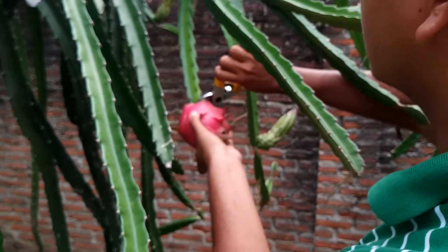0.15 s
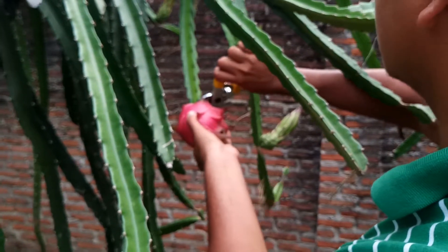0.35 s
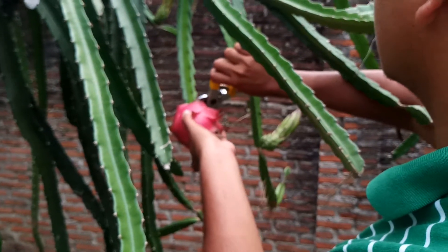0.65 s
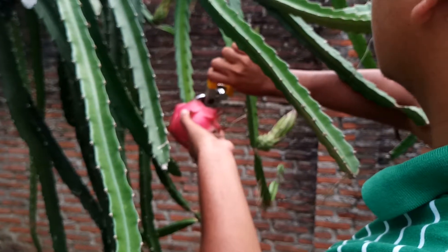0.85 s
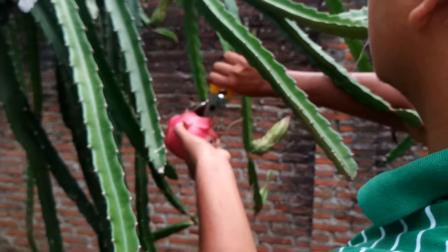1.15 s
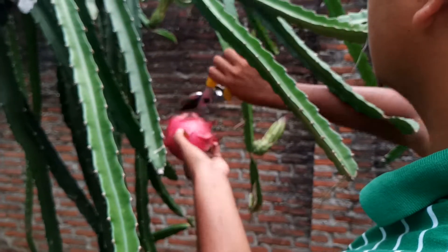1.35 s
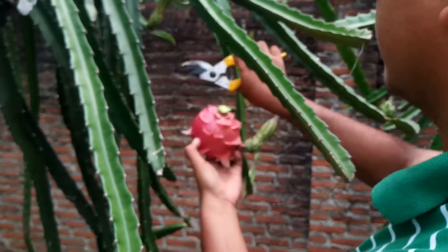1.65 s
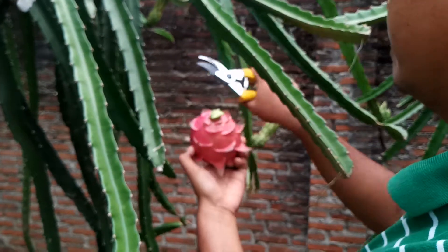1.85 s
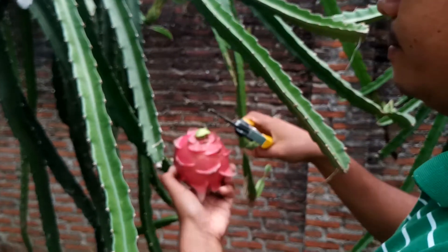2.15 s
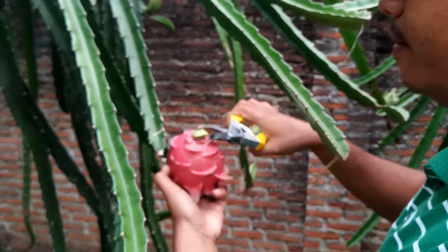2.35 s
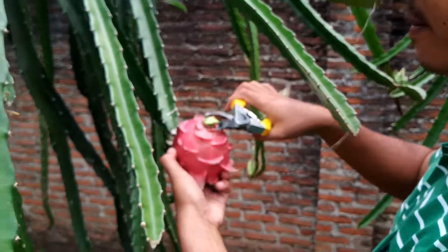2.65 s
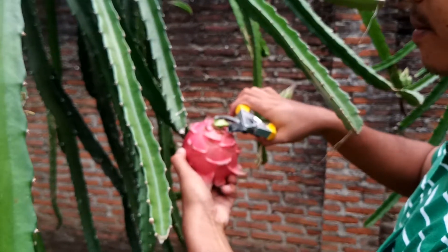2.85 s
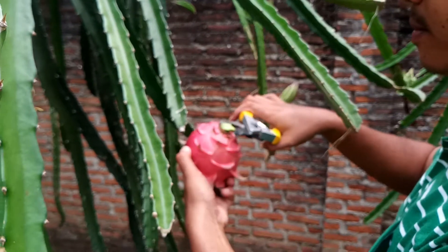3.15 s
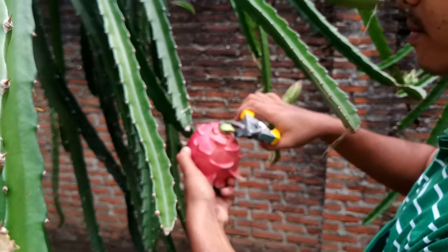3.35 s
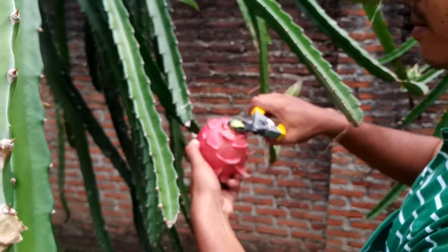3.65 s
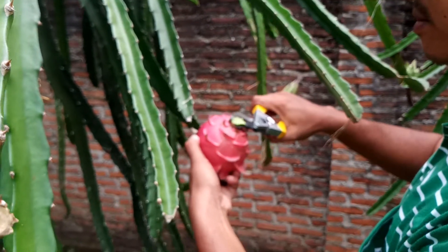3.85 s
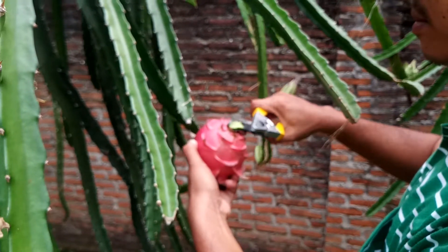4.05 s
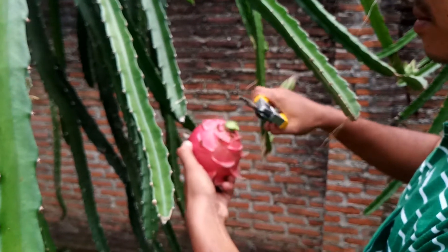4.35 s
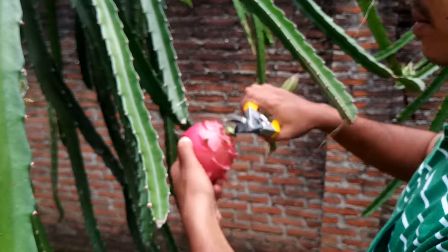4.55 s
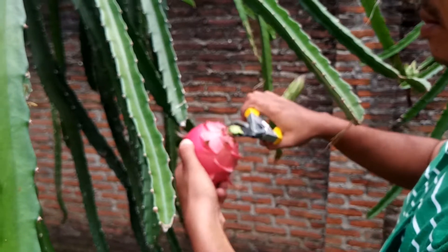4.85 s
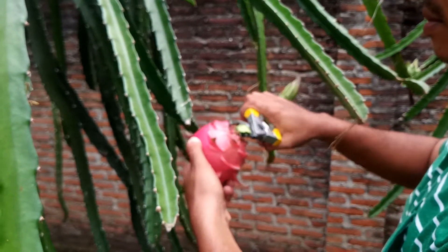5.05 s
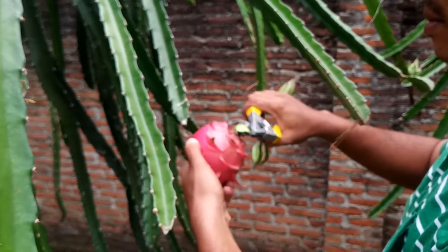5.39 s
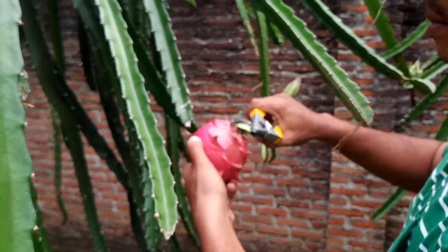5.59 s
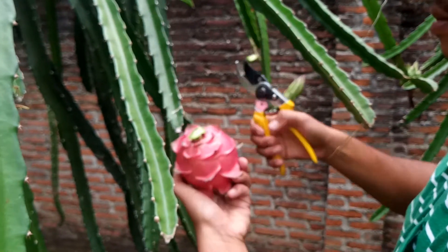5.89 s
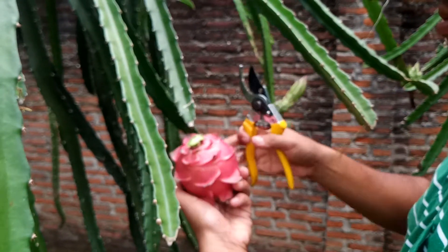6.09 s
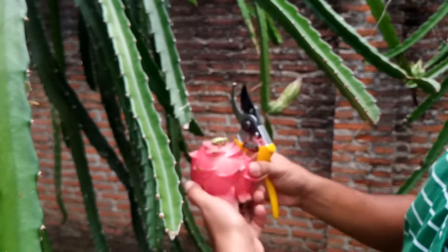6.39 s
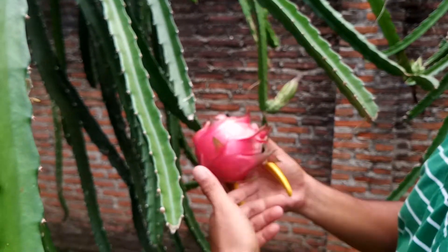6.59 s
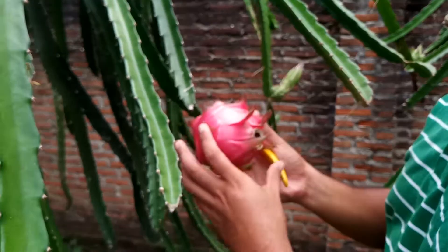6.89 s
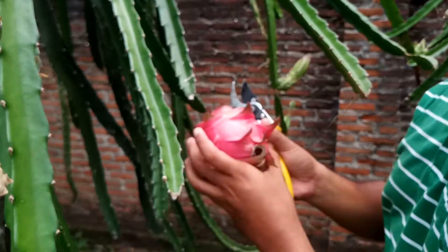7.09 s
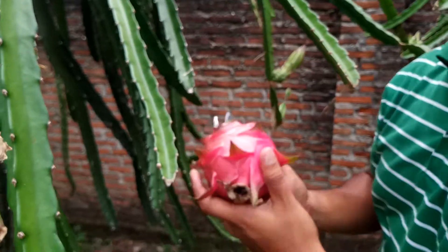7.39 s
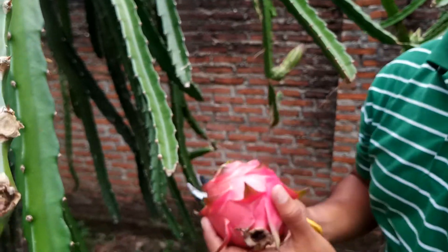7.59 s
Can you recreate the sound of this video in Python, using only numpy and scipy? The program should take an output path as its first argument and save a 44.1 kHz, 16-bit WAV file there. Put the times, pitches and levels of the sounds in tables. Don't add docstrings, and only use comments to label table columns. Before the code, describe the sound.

Outdoor walled garden, close stereo microphone, quiet background. From 0 to 0.8 s the last note of a distant rooster crow sags and dies, with faint hen clucks around it. At about 1.05 s shears tear through a thick juicy stem: a loud, dense crunch lasting hundredths of a second, with bright blade ring and short brick echo. Soft palm rubs and tiny ticks follow. Small birds give thin falling seeps near 1.6 and 2.9 s, a level peep at 3.3. Light leaf ticks from 3.4 s lead to fibre crackles at 4.0 and a sharp second snip at 4.12, then a small metallic click at 4.3. From 4.9 to 6.8 s peeps and seeps become more frequent. Fruit handling ticks at 6.4; skin and leaf rustles gather from 7 s, loudest at the end. Throughout: steady high insect band, low traffic rumble, barely audible machine hum, airy hiss.

```python
import sys
import numpy as np
from scipy import signal
from scipy.fft import rfft, irfft, next_fast_len
from scipy.io import wavfile
from scipy.ndimage import uniform_filter1d, map_coordinates

SR = 44100
rng = np.random.default_rng(int(sys.argv[2]) if len(sys.argv) > 2 else 0)


def inscribe(sig):
    pcm = np.round(np.clip(np.atleast_2d(sig).T, -1, 1) * 32767)
    wavfile.write(sys.argv[1], SR, pcm.astype(np.int16))


def field_ratio(decibels):
    return 10 ** (np.asarray(decibels, dtype=float) / 20)


N = 340893
TIME = np.arange(N) / SR


def unit(x):
    return x / np.sqrt(np.mean(x ** 2) + 1e-20)


def along(points, hz):
    point_hz, value = np.transpose(points)
    return np.interp(np.log(hz + 1), np.log(point_hz + 1), value)


def curves(rows):
    s, *columns = np.transpose(rows)
    return [np.interp(TIME, s, column) for column in columns]


def wobble(rate_hz, size=N):
    knots = rng.standard_normal(int(size * rate_hz / SR) + 4)
    return map_coordinates(knots, [TIME[:size] * rate_hz])


def filtered(x, response):
    size = next_fast_len(x.shape[-1] + 4096)
    hz = np.fft.rfftfreq(size, 1 / SR)
    return irfft(rfft(x, size) * response(hz), size)[..., :x.shape[-1]]


def stereo(pair, gain, alike):
    def mid_side_gain(hz):
        turn = np.arccos(np.clip(along(alike, hz), -1, 1)) / 2
        return gain(hz) * [np.cos(turn), np.sin(turn)]

    mid, side = filtered(pair, mid_side_gain)
    return np.array([mid + side, mid - side])


def sides(pan_db):
    return field_ratio([[pan_db / 2], [-pan_db / 2]])


def tail(t60, seconds, build_s):
    hz, t, z = signal.stft(rng.standard_normal((2, round(seconds * SR))), SR, nperseg=128)
    growth = 1 - np.exp(-(t + 1e-4) / build_s)
    decay = field_ratio(-60 * t / t60(hz)[:, None])
    echo = signal.istft(z * growth * decay, SR, nperseg=128)[1]
    return echo / np.linalg.norm(echo[0])


# frequency in Hz, correlation.
NEAR_ALIKE = [(600, 0.5), (1400, 0.58), (3100, 0.2), (6000, 0.04), (12000, -0.1)]


def tearing(shape, colour, body_db, sizzle_db, spiky_db):
    clumps = field_ratio(spiky_db * rng.exponential(size=len(shape) // 16 + 1))
    clumps = np.repeat(clumps, 16)[:len(shape)]
    breaks = unit(clumps) * rng.standard_normal((2, len(shape))) * shape
    tilt = [(3800, body_db), (5000, 0.0294), (8800, 0.0089), (10000, sizzle_db)]
    top = filtered(breaks[0], lambda hz: field_ratio(along(colour, hz)) * (hz > 5800) * (hz < 9000))
    scale = np.linalg.norm(shape) / np.linalg.norm(top)
    return scale * stereo(breaks, lambda hz: field_ratio(along(colour, hz) + along(tilt, hz)), NEAR_ALIKE)


# frequency in Hz, t60 in s.
GARDEN_T60 = [(300, 0.82), (2000, 0.29), (6000, 0.21), (12000, 0.14)]


def echoed(s, sound):
    echo = tail(lambda hz: along(GARDEN_T60, hz), 0.4, build_s=0.0024)
    wet = field_ratio(-12.5) * signal.fftconvolve(sound, echo, axes=1)
    heard = np.pad(wet, ((0, 0), (150, 0)))
    heard[:, :sound.shape[1]] += sound
    start = round(s * SR)
    return slice(start, start + heard.shape[1]), heard


# frequency in Hz, density in dB per Hz.
STEM = [(88, -40), (150, -23), (348, -31), (601, -15), (979, -28.5), (1260, -13.5), (1530, -15.5),
        (2140, -8.5), (3350, -13.5), (5570, -6.5), (7620, -7.5), (10800, -26), (13700, -27), (15100, -12),
        (16000, -36)]
# frequency in Hz, density in dB per Hz.
STUB = [(180, -71), (300, -52.5), (828, -20.5), (1030, -19.5), (1480, -11.5), (1640, -15), (2000, -12),
        (3030, -7.5), (3520, -8), (4370, -12), (6520, -1.5), (9390, -17.5), (13800, -26.5), (15000, -17),
        (16000, -30)]
# time in s, peak in dB, body in dB, sizzle in dB, left-right in dB.
CUTS = [(1.0108, -34.5, -23.5, -32, 2), (1.0472, -17, -3, -16, 1), (1.0506, -16.5, -5.5, -18, -0.5),
        (1.0557, -18.5, -2, -16, -1), (1.059, -28, -6.5, -16, -4), (3.9893, -29, -4.5, -19.5, 0),
        (4.0274, -38.5, -5.5, -17, -2), (4.0885, -43.5, -11, -21, -1), (4.0993, -44.5, -7, -19, -5),
        (4.1109, -34.5, -4, -19, -4), (4.1156, -25, 0, -8, 4), (4.1187, -17, -2.5, -10, 2.5),
        (4.1267, -15.5, -8.5, -18.5, -4), (4.2073, -41, -0.5, -29, -3), (4.291, -42.5, -2.5, -36, -4)]
# time in s, peak in dB.
THIN_TICKS = [(3.7826, -42), (3.868, -57), (3.9233, -48), (3.9439, -50), (3.9644, -45), (3.969, -47),
              (4.4884, -52), (5.197, -54), (5.6276, -54), (5.7778, -38.5), (7.3552, -40.5)]
# time in s, peak in dB.
DULL_TICKS = [(.837, -54), (1.3409, -50), (1.4533, -52), (2.3669, -46), (2.467, -51), (3.3235, -51),
              (5.059, -51), (6.4203, -39.5), (7.1132, -50), (7.421, -50)]
# time in s, peak in dB.
CRISP_TICKS = [
    (1.8, -49),
    (2.0294, -54),
    (3.4577, -47),
    (3.475, -42.5),
    (3.7464, -45),
    (3.8397, -50),
    (7.3011, -36),
]
# time in s, peak in dB.
KNOCKS = [
    (.2446, -53),
    (2.6953, -63),
    (4.2797, -62),
    (5.7404, -63),
]
TRIM_FROM_S = 2
LAST_FIBRE_FROM_S = 1.058
SCATTER_DB = 3


def cut_t60_s(s):
    if s > TRIM_FROM_S:
        return 0.027
    return 0.036 if s > LAST_FIBRE_FROM_S else 0.014


def cracks():
    out = np.zeros((2, N + SR))
    t = np.arange(-SR // 50, SR // 8) / SR
    events = [(*cut, cut_t60_s(cut[0])) for cut in CUTS]
    # ticks, body_db, sizzle_db
    kinds = (THIN_TICKS, -24, -27), (DULL_TICKS, -12, -25), (CRISP_TICKS, -13, -16), (KNOCKS, 5.5, -17)
    for ticks, body_db, sizzle_db in kinds:
        for s, db in ticks:
            events.append((s, db, body_db, sizzle_db, rng.normal(0, SCATTER_DB), 0.025))
    for s, db, body_db, sizzle_db, pan_db, t60_s in events:
        rise = 1 - np.exp(-np.abs(t) / 0.00037)
        shape = (t > 0) * rise * field_ratio(-60 * np.abs(t) / t60_s)
        colour = STUB if s > TRIM_FROM_S else STEM
        crack = tearing(shape, colour, body_db + 2.5, sizzle_db + 15.5, spiky_db=-0.4)
        span, heard = echoed(s + t[0], field_ratio(db - 3.5) * sides(pan_db) * crack)
        out[:, span] += heard
    return out[:, :N]


# peak time in s, frequency in Hz, peak in dB.
RINGS = [(1.047, 4500, -26), (1.049, 2120, -24.5), (1.049, 1780, -29), (1.052, 618, -52), (1.05, 800, -49),
         (1.05, 1350, -40), (1.058, 223, -53), (1.0555, 5550, -13.5), (1.05, 7200, -22),
         (4.118, 840, -43.5), (4.118, 1500, -34.5), (4.117, 3400, -18.5), (4.119, 2650, -30),
         (4.12, 2050, -31), (4.1275, 6500, -19), (4.292, 1300, -52.5), (4.291, 3400, -42),
         (4.296, 5300, -24), (4.301, 5500, -40), (4.3033, 5750, -27.5), (3.7, 5500, -43), (7.52, 313, -61),
         (7.52, 1450, -59), (3.991, 1750, -43), (3.991, 3250, -38), (3.991, 5200, -34), (6.422, 4650, -42),
         (7.304, 5100, -42), (5.1, 5750, -45)]


def rings():
    out = np.zeros((2, N + SR))
    t = np.arange(-SR // 50, SR // 8) / SR
    for s, hz, db in RINGS:
        rise_s = 0.0004 + 1.6 / hz
        t60_s = 0.04 * (hz / 1000) ** -0.59
        shape = np.where(t < 0, np.exp(-(t / rise_s) ** 2), field_ratio(-60 * np.abs(t) / t60_s))
        port_delay_s = np.array([[0], [0.00012]])
        ring = shape * np.sin(2 * np.pi * hz * (t - port_delay_s))
        start = round((s + t[0]) * SR)
        out[:, start:start + len(t)] += field_ratio(db + 2.0 * wobble(200, size=len(t))) * ring
    return out[:, :N]


def shears():
    return cracks() + rings()


# middle in s, rms in dB, length in s.
PALM_RUBS = [(.801, -75, 0.072), (1.075, -53.5, 0.032), (1.131, -54, 0.022), (1.38, -64.5, 0.05),
             (1.892, -67.5, .05), (2.403, -69, 0.089), (4.305, -57.5, 0.023), (5.792, -67, 0.027),
             (7.203, -66, 0.047), (7.279, -68.5, 0.075), (7.441, -64, 0.043), (7.525, -55, 0.046)]
# middle in s, rms in dB, length in s.
SKIN_SLIDES = [
    (.925, -61, 0.04),
    (2.116, -64.5, 0.07),
    (3.61, -64, .048),
    (3.791, -58.5, 0.023),
    (4.951, -73.5, .45),
    (6.369, -60, 0.021),
    (7.038, -56, 0.032),
    (7.355, -57, 0.042),
]
# middle in s, rms in dB, length in s.
LEAF_BRUSHES = [
    (3.493, -61.5, 0.046),
    (3.957, -78, .05),
    (5.384, -65, 0.011),
    (6.459, -59, .038),
    (7.63, -60, 0.14),
    (7.722, -53, .06),
]


def rustle():
    out = np.zeros((2, N + 4 * SR))
    # swishes, body_db, sizzle_db
    kinds = (PALM_RUBS, 1.45, -14.5), (SKIN_SLIDES, -8, -21), (LEAF_BRUSHES, -5.5, -9.5)
    for swishes, body_db, sizzle_db in kinds:
        for s, db, length_s in swishes:
            reach = SR // 4 if length_s < 0.1 else SR
            t = np.arange(-reach, reach) / SR
            swell = np.exp(-(t / length_s) ** 2)
            swish = tearing(swell, STUB, body_db, sizzle_db + 5.0, spiky_db=2.0)
            swish *= field_ratio(1.46 * wobble(69.7, size=len(t)))
            start = round(s * SR) + SR - reach
            out[:, start:start + len(t)] += field_ratio(db) * sides(rng.normal(-1, SCATTER_DB)) * swish
    return out[:, SR:SR + N]


# start in s, length in s, start pitch in Hz, level in dB.
SEEPS = [
    (.405, 0.023, 8250, -70),
    (1.646, 0.026, 8000, -65),
    (2.804, 0.013, 8300, -69),
    (2.915, 0.026, 7930, -64),
    (3.096, 0.022, 8660, -79),
    (5.192, 0.045, 7620, -66),
    (5.826, .06, 7950, -60),
    (6.514, .075, 7490, -60.5),
]
# start in s, length in s, pitch in Hz, level in dB.
PEEPS = [(.43, 0.025, 6850, -79), (.43, 0.038, 4900, -77), (3.287, 0.021, 6290, -62),
         (3.4, .022, 7300, -70), (4.892, .055, 6480, -68), (5.246, 0.032, 6950, -69),
         (5.438, .038, 7410, -79), (5.563, 0.07, 6280, -63), (5.878, 0.13, 6890, -70.5),
         (6.25, 0.087, 5800, -69), (6.578, 0.19, 6330, -73)]
# start in s, length in s, start pitch in Hz, level in dB.
CLUCKS = [(.75, 0.028, 2230, -71), (0.82, 0.087, 510, -73.5), (0.71, .23, 425, -76.5),
          (1.171, 0.105, 1255, -78), (2.446, 0.062, 1273, -78), (2.12, .04, 3870, -77),
          (1.5, .05, 1900, -86), (3.48, 0.028, 1920, -79), (7.57, .13, 800, -73.5), (7.54, .1, 1300, -72.5),
          (7.58, .12, 1700, -75)]


def birds():
    out = np.zeros((2, N + 2 * SR))
    # calls, end pitch over start, echo t60_s, huskiness
    kinds = (SEEPS, 0.86, 0.38, 0.0089), (PEEPS, 1.01, 0.65, 0.012), (CLUCKS, 0.94, 0.21, 0.033)
    for calls, glide, t60_s, husky in kinds:
        for s, length_s, from_hz, db in calls:
            u = np.arange(SR // 4) / (length_s * SR)
            pitch_hz = from_hz * (1 + (glide - 1) * u) * (1 + husky * wobble(150, size=len(u)))
            shape = np.sin(np.pi * np.clip(u, 0, 1)) ** 0.1305 * (u < 1)
            note = field_ratio(db) * shape * np.sin(2 * np.pi * np.cumsum(pitch_hz) / SR)
            echo = tail(lambda hz: np.full_like(hz, t60_s), 0.55, build_s=0.021)
            heard = signal.fftconvolve(note[None], echo, axes=1)
            heard[:, :len(u)] += 0.1 * note
            start = round(s * SR)
            out[:, start:start + heard.shape[1]] += field_ratio(8.5) * heard
    return out[:, :N]


# time in s, loudness in dB, beak opening (second partial over first) in dB.
CROW = [
    (0, -65, -2),
    (.08, -65.5, 13),
    (.2, -66.5, 12),
    (.29, -69.5, -3.5),
    (.43, -69.5, 12),
    (.49, -80, 2),
    (.57, -69, 1),
    (.635, -66, -19),
    (.8, -80, -16),
]


def rooster():
    loud_db, open_db = curves(CROW)
    pitch_hz = 763.4 - 124 * np.minimum(TIME, 1) ** 2
    phase = 2 * np.pi * np.cumsum(pitch_hz * (1 + 0.00506 * wobble(60))) / SR
    first_db = loud_db - open_db / 2
    second_db = loud_db + open_db / 2
    fifth_db = -17.5 + 12 * TIME + loud_db + np.minimum(open_db, 0) / 2
    voice = np.zeros(N)
    for k, db in ((1, first_db), (2, second_db), (5, fifth_db)):
        voice += field_ratio(db + 3 + 2.8 * wobble(45)) * np.sin(k * phase)
    voice *= np.clip((CROW[-1][0] - TIME) / 0.029, 0, 1)
    echo = tail(lambda hz: np.full_like(hz, 0.31), 0.43, build_s=0.01)
    far = signal.oaconvolve(voice[None], echo, axes=1)[:, :N]
    return 0.9 * voice * sides(0.5) + 0.3 * far


# centre in Hz, half width in Hz.
INSECT_BAND = (5440, 200)
# time in s, level in dB.
CHORUS = [(0.0, -65), (0.34, -66), (2.24, -66), (2.67, -67), (4.33, -64), (4.52, -65), (7.34, -66),
          (7.73, -66.5)]


def insects():
    chorus_db, = curves(CHORUS)
    centre_hz, half_hz = INSECT_BAND
    noise = rng.standard_normal((2, N))
    band = filtered(noise, lambda hz: 1 / (1 + np.abs((hz - centre_hz) / half_hz) ** 4))
    return field_ratio(chorus_db + 4.0 + 0.8 * wobble(12)) * unit(band)


# frequency in Hz, density in dB per Hz.
TRAFFIC = [(20, -30.5), (30, -16), (42, -18), (58, -8.5), (75, -5.5), (105, 0.5), (160, -2.5), (250, -9.5),
           (400, -17), (650, -41), (1200, -120)]
# time in s, level in dB.
ROAD = [(0.0, -72), (1.81, -67.5), (2.84, -70.5), (3.01, -68.5), (3.31, -70.5), (5.42, -71.5), (6.03, -71),
        (7.43, -72.5), (7.73, -71.5)]
# frequency in Hz, correlation.
FAR_ALIKE = [(40, 0.55), (120, 0.46), (300, 0.047), (700, 0.12), (1500, 0)]


def traffic():
    road_db, = curves(ROAD)
    rumble = stereo(rng.standard_normal((2, N)), lambda hz: field_ratio(along(TRAFFIC, hz)), FAR_ALIKE)
    return field_ratio(road_db + 4.0 + 0.82 * wobble(19)) * unit(rumble)


def machine():
    return field_ratio(-80 + 3 * wobble(3)) * np.sin(2 * np.pi * 88.0 * TIME)


def patchy(depth_db):
    z = signal.stft(rng.standard_normal((2, N)), nperseg=512)[2]
    field = uniform_filter1d(rng.standard_normal(z.shape[1:]), size=8, axis=0)
    field = uniform_filter1d(field, size=10, axis=1)
    return signal.istft(z * field_ratio(depth_db * unit(field)), nperseg=512)[1][:, :N]


# frequency in Hz, density in dB per Hz.
AIR = [(250, -3.5), (500, -5.5), (1000, -10), (2000, -14), (4000, -15.5), (6300, -13), (7800, -16.5),
       (8800, -28.5), (13600, -29.5), (14200, -34), (15000, -16), (15480, -20.5), (15560, -61)]


def air():
    hiss = stereo(patchy(depth_db=1.5), lambda hz: field_ratio(along(AIR, hz)) * (hz > 250), FAR_ALIKE)
    return field_ratio(-67 + 0.41 * wobble(2.48)) * unit(hiss)


# frequency in Hz, left-right in dB.
LEFT_LIFT = [(3000, 0.1), (6000, 1.5), (9000, 4.5), (13000, 7.5)]


def scene():
    near = filtered(shears() + rustle(), lambda hz: field_ratio(along(LEFT_LIFT, hz) * [[0.5], [-0.5]]))
    return near + birds() + rooster() + insects() + traffic() + machine() + air()


def top_cut(x):
    return signal.sosfilt(signal.butter(12, 16810, fs=SR, output="sos"), x)


def record(dry):
    limited = filtered(dry, lambda hz: 1 / (1 + (hz / 15900) ** 60))
    return top_cut(limited)


dry = scene()
out = record(dry)
inscribe(out)
```